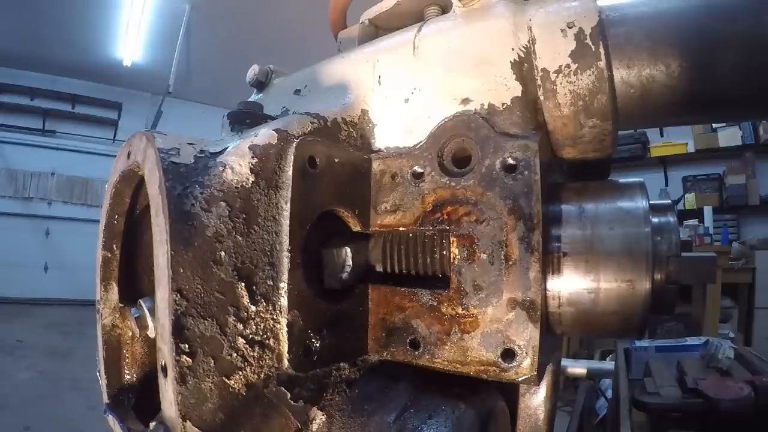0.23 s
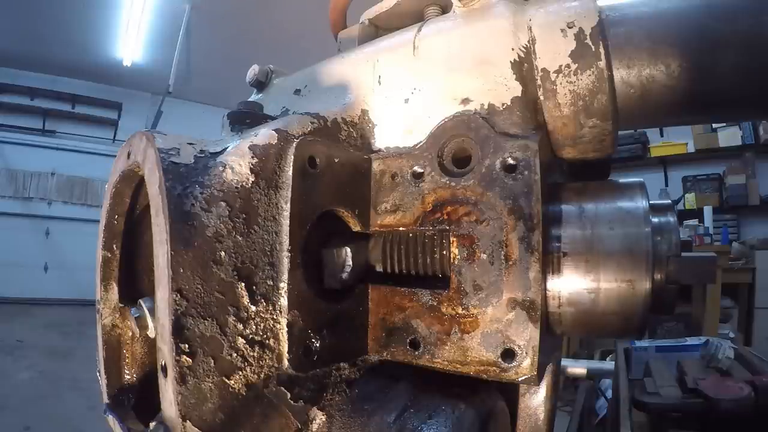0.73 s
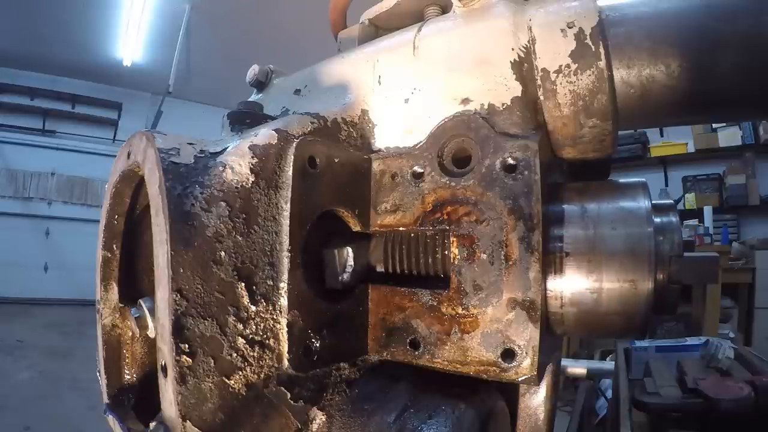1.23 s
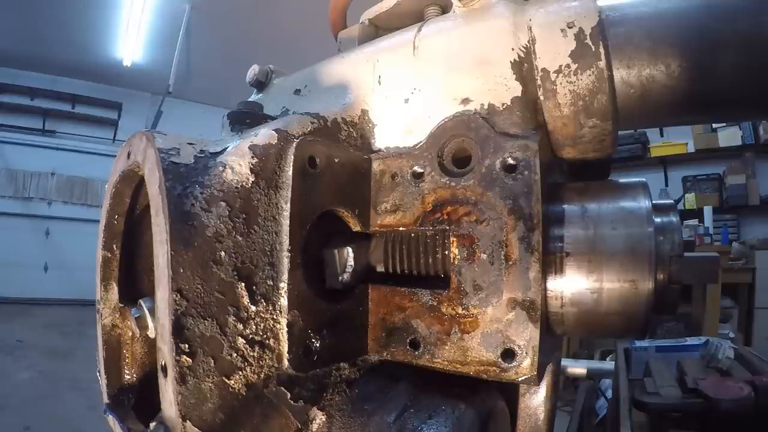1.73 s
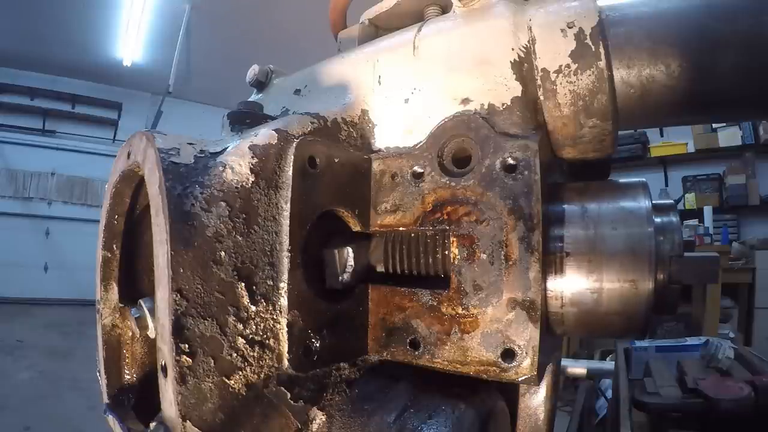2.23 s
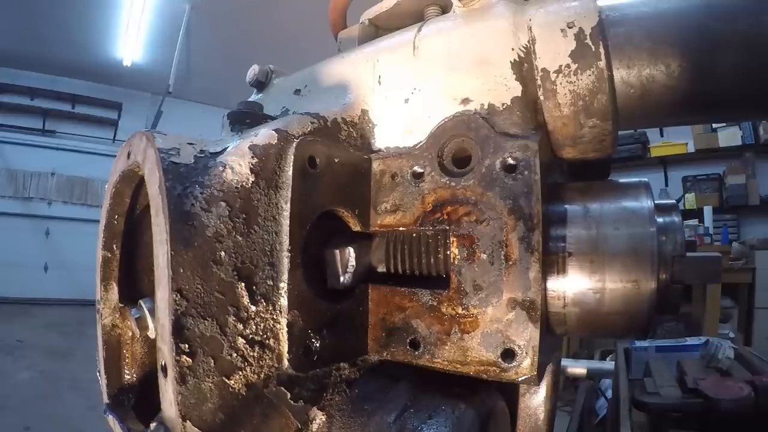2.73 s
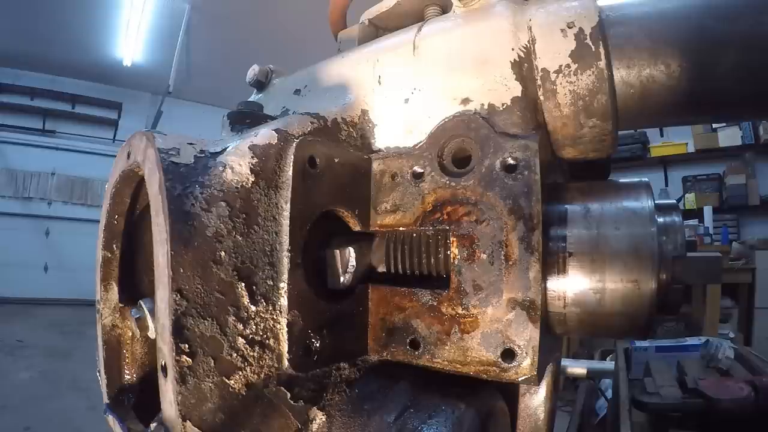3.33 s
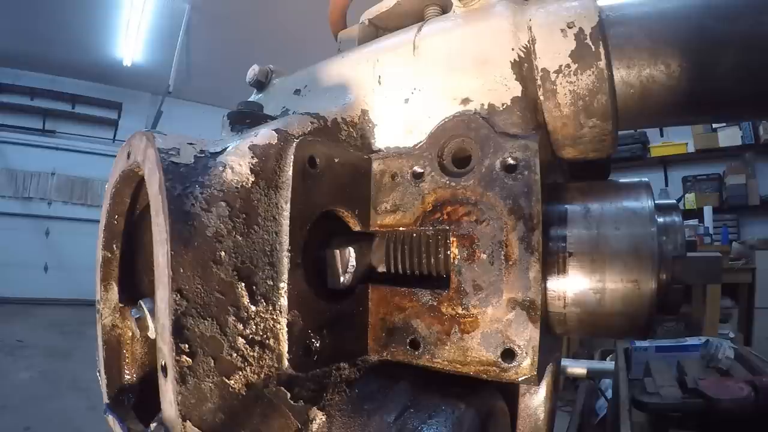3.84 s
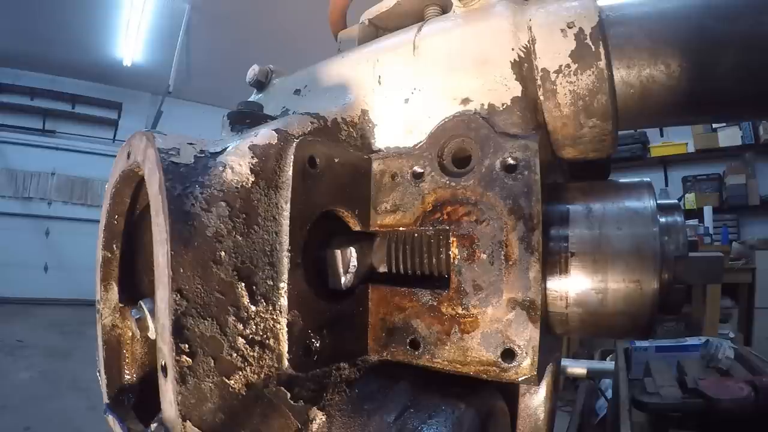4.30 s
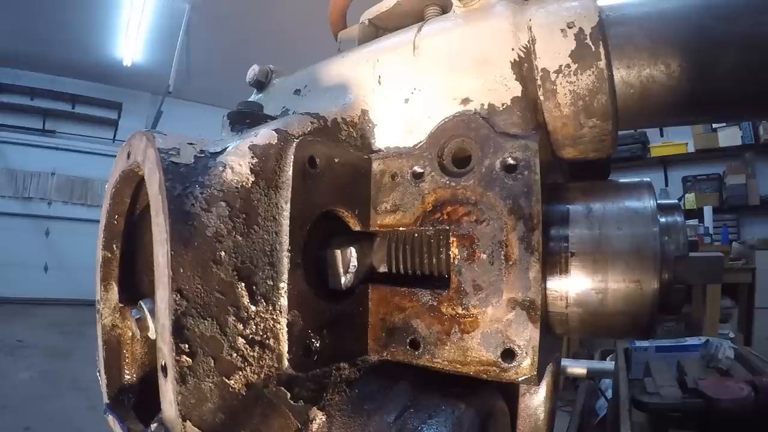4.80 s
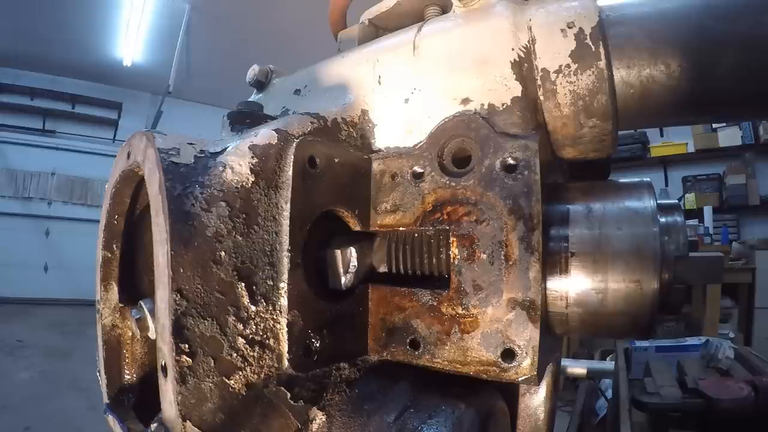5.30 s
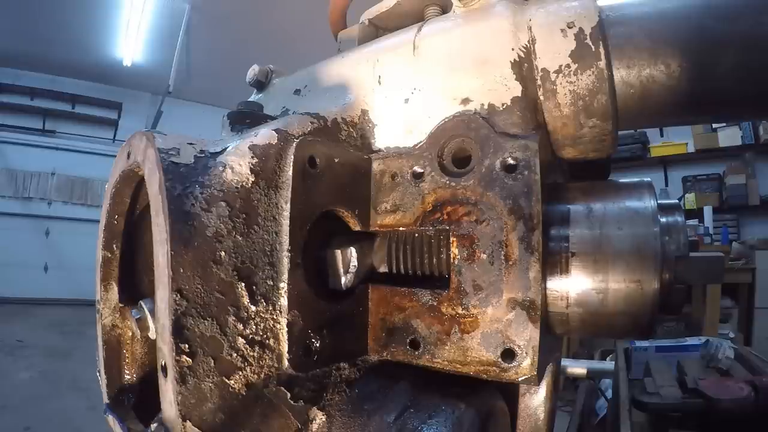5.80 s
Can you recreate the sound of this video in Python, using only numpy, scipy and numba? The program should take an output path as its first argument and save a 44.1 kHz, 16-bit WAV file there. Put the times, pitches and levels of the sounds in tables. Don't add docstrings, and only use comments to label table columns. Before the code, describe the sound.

Close up in a reverberant workshop, a stuck steel part jerks loose four times with huge cracking bangs, the last duller. Each is preceded by a handle tap and small oil gulp, and followed at once by a dull rebound blow. Between them come plate hits, dry ticks, bright clinks and soft thuds over fan rumble and mains hum. The camera microphone ducks after each bang.

```python
import sys
import numpy as np
from scipy import signal
from scipy.fft import rfft, irfft
from scipy.io import wavfile
from scipy.ndimage import uniform_filter1d
from numba import njit

SR = 44100
rng = np.random.default_rng(int(sys.argv[2]) if len(sys.argv) > 2 else 0)


def level_to_linear(level):
    exponent = np.asarray(level, float) / 20
    return 10 ** exponent


def dump(signal):
    limited = np.clip(np.atleast_2d(signal).T, -1, 1)
    pcm = np.round(limited * 32767).astype(np.int16)
    wavfile.write(sys.argv[1], SR, pcm)


N = 266977
HZ = np.fft.rfftfreq(N, 1 / SR)


def along(table, hz):
    points_hz, values = np.transpose(table)
    return np.interp(np.log(hz + 1), np.log(points_hz), values)


def colour(x, table, share=1):
    return irfft(rfft(x, N) * level_to_linear(share * along(table, HZ)), N)


def causal(table, size=2048):
    log_spectrum = np.log(level_to_linear(along(table, np.fft.rfftfreq(size, 1 / SR))))
    cepstrum = irfft(log_spectrum, size)
    folded = np.concatenate([cepstrum[:1], 2 * cepstrum[1:size // 2], np.zeros(size // 2)])
    blow = irfft(np.exp(rfft(folded)), size)
    return blow / np.abs(blow).max()


def ring(modes, seconds):
    t = np.arange(int(seconds * SR)) / SR
    tones = sum(level_to_linear(db - 60 * t / t60) * np.sin(2 * np.pi * hz * t) for hz, db, t60 in modes)
    return (1 - np.exp(-t / 0.00051)) * tones


def add(out, s, x):
    i = int(s * SR)
    out[i:i + len(x)] += x[:N - i]


def walk(rate):
    k = int(SR / rate)
    steps = np.repeat(rng.standard_normal(N // k + 1), k)
    return 1.3 * uniform_filter1d(uniform_filter1d(steps, k), k)[:N]


def pair(apart_table):
    shared, apart = rng.standard_normal((2, N))
    return shared + colour(apart, apart_table) * np.array([[1], [-1]])


# (frequency [Hz], level [dB per Hz])
AIR = [(15, -22), (25, -0.5), (126, -10.5), (198, -15), (340, -14.5), (410, -19.5), (469, -12.5),
       (567, -26.5), (895, -26.5), (1170, -23), (2060, -37.5), (4750, -40), (6920, -43), (14300, -42),
       (15500, -41)]
# (frequency [Hz], unrelated part under the shared [dB])
AIR_APART_DB = [(50, -45), (500, -20), (2000, -4), (5000, -3.5), (12000, -1)]
# (frequency [Hz], rms level [dB], pitch wander [%], level wander [dB])
TONES = [
    (51.4, -38, 2.75, 2.5),
    (119.8, -39, 0.37, -0.1),
    (151.3, -56.5, 1.5, 5.5),
    (472.5, -55, 3.5, 4),
    (1184, -60.5, 1.19, -3.5),
    (4740, -66.5, 1.28, -2),
    (9580, -65.5, 0.576, 3),
    (14350, -62, 1.1, 1.5),
]


def background():
    air = colour(pair(AIR_APART_DB), AIR)
    air = air * level_to_linear(-46.5 + 1.0 * walk(4.7)) / np.sqrt(np.mean(air ** 2))
    tones = 0
    for hz, db, wander, flutter_db in TONES:
        quick = hz / 40 + 6
        phase = 2 * np.pi * np.cumsum(hz * (1 + wander / 100 * walk(quick))) / SR
        tones = tones + np.sqrt(2) * level_to_linear(db + flutter_db * walk(quick)) * np.sin(phase)
    left_minus_right_db = -1.5
    return (air * level_to_linear(7.0) + tones) * level_to_linear(left_minus_right_db * np.array([[.5], [-.5]]))


# (time [s], level [dB])
RUSTLE = [
    (0.78, -70),
    (0.82, -60),
    (0.944, -48.5),
    (1.08, -60),
]


def sleeve():
    s, db = np.transpose(RUSTLE)
    grains = rng.standard_normal(N) * level_to_linear(2.23 * walk(119.7))
    cloth = signal.sosfilt(signal.butter(2, [500, 6000], "bandpass", fs=SR, output="sos"), grains)
    swell_db = np.interp(np.arange(N) / SR, s, db, left=-120, right=-120)
    return cloth / cloth.std() * level_to_linear(swell_db)


# (time [s], level [dB], hardness [dB per octave], metal ring [dB])
SOCKET_TAPS = [
    (0.0477, -23.5, 1.3, -39.5),
    (1.941, -24.5, 0.6, -42),
    (3.537, -28.5, 2.5, -48),
    (5.012, -33, -3, -69),
]


def gulps():
    lag_s, start_hz, rise_hz_per_s, t60_s, level_db = 0.00812, 526, 11000, .06, -31
    t = np.arange(int(.05 * SR)) / SR
    envelope = (1 - np.exp(-t / 0.0023)) * level_to_linear(level_db - 60 * t / t60_s)
    bubble = envelope * np.sin(2 * np.pi * (start_hz + rise_hz_per_s * t / 2) * t)
    out = np.zeros(N)
    for s, *_ in SOCKET_TAPS:
        add(out, s + lag_s, bubble)
    return out


# (time [s], level [dB], hardness [dB per octave])
THUDS = [
    (1.1064, -43, -3.5),
    (2.606, -33.5, -1.2),
    (4.2306, -17, 3.5),
    (5.7285, -30.5, -0.3),
    (5.9867, -28.5, 0.2),
]
# (time [s], level [dB], hardness [dB per octave])
TICKS = [
    (1.6174, -29, 0.5),
    (3.1617, -37, 4),
    (3.1739, -18.5, 1),
    (3.1973, -27, 5),
    (4.6788, -21.5, -.5),
    (5.4196, -19, -3),
    (6.0398, -35, 4),
]
# (time [s], level [dB], hardness [dB per octave], metal ring [dB])
PLATE_HITS = [
    (1.3114, -26, -3, -39),
    (2.827, -16.5, 0.5, -22.5),
    (4.372, -23, 0.5, -30.5),
]
CLINKS = [
    (1.5773, -44, -5, -44),
    (1.6244, -19.5, 2, -30),
    (4.6648, -44, -12, -54),
    (4.7068, -21, 2, -35),
]
LATCH = [
    (4.2404, -25.5, .1, -40.5),
    (4.278, -33, .1, -39.5),
]
# (rows, levels of the six parts [dB], levels of the bar's five mode groups, low to high [dB])
KINDS = [
    (THUDS, (1, 9.5, -19.5, -31, -31, -45), ()),
    (TICKS, (-2, -10.5, -46, -9.5, -13.5, -35), ()),
    (PLATE_HITS, (0.5, -27, -5, -5, -13, -44), (2.5, -12, -15, -9, -43)),
    (SOCKET_TAPS, (1.5, -24, -13.5, -10.5, -8.5, -14.5), (-22, -7, -14, 1, -32)),
    (CLINKS, (-2.5, -29, -10, -6.5, -15.5, -27), (-30, 0, -4, -8.5, -25)),
    (LATCH, (3.5, -3, -16, -25, -2, -25), (-24, -23, -12, 1.5, -0.5)),
]
# (low edge [Hz], high edge [Hz], rattle t60 [s])
PARTS = [
    (925, 1680, 0.031),
    (127, 528, 0.044),
    (392, 541, 0.023),
    (2170, 3070, 0.058),
    (3320, 6340, 0.014),
    (6370, 8500, 0.033),
]
# (frequency [Hz], t60 [s])
BAR = [
    [(470, .1), (520, .06)],
    [(1448, .2), (1455, .38)],
    [(2490, .15), (2610, .3), (2720, .2)],
    [(3900, .05)],
    [(5900, .07)],
]


def handle():
    pivot_hz = 1220
    t = np.arange(int(.1 * SR)) / SR
    near, far = np.zeros(N), np.zeros(N)
    strikes = [(row, parts_db, rings_db) for rows, parts_db, rings_db in KINDS for row in rows]
    roughs = rng.standard_normal((len(strikes), len(t)))
    for (row, parts_db, rings_db), rough in zip(strikes, roughs):
        s, db, hard_db, *ring_db = row
        for (lo_hz, hi_hz, t60), part_db in zip(PARTS, parts_db):
            octaves = np.log2(np.sqrt(lo_hz * hi_hz) / pivot_hz)
            size = level_to_linear(db + part_db + hard_db * octaves)
            band = signal.butter(3, [lo_hz, hi_hz], "bandpass", fs=SR, output="sos")
            click = signal.sosfilt(band, 1. * (t == 0))
            click = click / click.max()
            rattle = signal.sosfilt(band, rough * level_to_linear(-60 * t / t60))
            rattle = rattle / np.abs(rattle).max()
            add(near, s, size * (0.31 * click + 1.06 * rattle))
            add(far, s, size * level_to_linear(4.5) * click)
        if ring_db:
            modes = [(hz, ring_db[0] + group_db + hard_db * np.log2(hz / pivot_hz), t60)
                     for group, group_db in zip(BAR, rings_db) for hz, t60 in group]
            tone = ring(modes, seconds=.6)
            add(near, s, tone)
            add(far, s, level_to_linear(-5) * tone)
    return near, far


# (time [s], peak level [dB], softness [0-1])
SLIPS = [
    (0.196, 1.5, 0),
    (2.1, 1, 0),
    (3.699, 1, 0.01),
    (5.17, 1.47, 1),
]
# (level when sharp [dB], change when soft [dB])
SLIP_DB = [
    (-9, -6.5),
    (-6, -30),
    (-7.5, -2.5),
    (0.5, 1),
]
# (time [s], peak level [dB], pitch [Hz])
REBOUNDS = [
    (0.226, -3, 1300),
    (2.132, 0, 1300),
    (3.729, -3, 1300),
    (5.188, -1, 1300),
]
# (frequency [Hz], level [dB per Hz])
BLOW = [(41, -41), (70, -37), (147, -6), (192, -2), (230, -3), (578, -11.5), (828, -6), (947, -4),
        (1210, -3.5), (1700, -5.5), (2130, -14.5), (4080, -17), (4460, -20.5), (6530, -26.5),
        (15000, -46.5)]
# (frequency [Hz], level [dB], t60 [s])
CASTING = [(818, -1, 0.51), (921, -6, 0.73), (996, -2, 0.53), (1195, -2, 0.54), (1276, -6, 0.64),
           (1346, -3, 0.45), (1453, -3, 0.72), (1620, -4, 0.51), (1814, -16, 1.6), (1933, 0, 0.23),
           (2159, -21, 0.87), (2385, -17, 0.73), (2487, -3, 0.22), (2670, -8, 0.31), (2756, -11, 0.51),
           (3020, -14, 0.75), (3359, -18, 0.59), (3553, -19, 0.81), (3887, -16, 0.53), (4102, -10, 0.45),
           (4156, -14, 0.46), (4813, -10, 0.24), (5399, -22, 0.49), (5631, -16, 0.31), (5879, -21, 0.58),
           (6374, -25, 0.62), (6718, -21, 0.49), (7704, -26, 0.39)]


def slips():
    t = np.arange(int(.04 * SR)) / SR
    body = causal(BLOW, size=8192)
    clamped = ring([(hz, db / 2, .04) for hz, db, t60 in CASTING], seconds=8192 / SR)
    snap = body + level_to_linear(-27) * clamped[:len(body)]
    split = signal.butter(3, 2100, fs=SR, output="sos")
    thin = signal.butter(2, 650, "highpass", fs=SR, output="sos")
    near, far = np.zeros(N), np.zeros(N)
    roughs = rng.standard_normal((len(SLIPS), len(t)))
    for (s, db, soft), rough in zip(SLIPS, roughs):
        softness = np.clip(soft, 0, 1)
        treble_db, thump_db, grit_db, room_db = (sharp + softness * change for sharp, change in SLIP_DB)
        tear = (1 - np.exp(-t / 0.0017)) * level_to_linear(grit_db - 4.5 - 60 * t / 0.028)
        grit = signal.sosfilt(thin, signal.fftconvolve(tear * rough, body))
        for out, crack, gain_db in ((near, grit, 12), (far, snap, room_db + 14.5)):
            dull = signal.sosfilt(split, crack)
            bright = crack - dull
            add(out, s, level_to_linear(db + gain_db) * (dull + level_to_linear(treble_db + 9.5) * bright))
        add(near, s, level_to_linear(db + 4.5) * ring([(1315, 0.0058, 0.0095)], seconds=.03))
        frame = [(195.0, thump_db, 0.43), (113, -8.5, 0.11), (327, -11, 0.1), (252, 7.5, .025)]
        add(near, s + 0.00064, level_to_linear(db - 12.5) * ring(frame, seconds=0.36))
    for s, db, hz in REBOUNDS:
        blow = ring([(hz, db + 7, .011), (.62 * hz, db - 6, .03)], seconds=.04)
        add(near, s + 0.00069, blow)
        add(far, s, level_to_linear(-3) * blow)
    return near, far


# (frequency [Hz], unrelated part under the shared [dB])
APART_DB = [(50, -30), (500, -30), (2000, -22), (5000, -12), (12000, -2)]


def ports(x):
    t = np.arange(512) / SR
    scatter = rng.standard_normal(len(t)) * level_to_linear(-60 * t / .012)
    scatter = scatter / np.sqrt(np.sum(scatter ** 2))
    apart = colour(signal.fftconvolve(x, scatter)[:N], APART_DB)
    return x + level_to_linear(-3.5) * apart * np.array([[1], [-1]])


# (frequency [Hz], t60 [s])
SHOP_T60 = [(60, 4), (170, 0.56), (400, 0.81), (1000, 1.09), (2500, 1.085), (5000, 1.01), (8000, 0.89),
            (14000, 0.75)]


def shop(x, wet_db):
    t = np.arange(2 * SR) / SR
    dense = rfft(pair(APART_DB))
    tail = 0
    for hz in 45 * 2 ** np.arange(0, 9, .5):
        band = np.clip(1 - 2 * np.abs(np.log2((HZ + 1) / hz)), 0, 1)
        tail = tail + irfft(dense * band, N)[:, :2 * SR] * level_to_linear(-60 * t / along(SHOP_T60, hz))
    tail = tail * (1 - np.exp(-t / 0.0092))
    return level_to_linear(wet_db) * signal.fftconvolve(x[None], tail, axes=1)[:, :N]


def scene():
    near, far = np.add(slips(), handle())
    return shop(far, wet_db=-37.5) + sleeve() + background() + ports(near + gulps())


@njit
def follow(x, down, up):
    y, e = np.empty(len(x)), x[0]
    for i in range(len(x)):
        e += (x[i] - e) * (down if x[i] < e else up)
        y[i] = e
    return y


def gain_control(x):
    keen = signal.butter(2, 2000, "highpass", fs=SR, output="sos")
    treble = np.abs(signal.sosfilt(keen, x)).max(axis=0)
    loud_db = 20 * np.log10(follow(treble, 1 / (0.0056 * SR), 1 / (0.046 * SR)) + 1e-6)
    wanted_db = -10.5 * np.clip((loud_db + 41.5) / 7, 0, 1)
    return x * level_to_linear(follow(wanted_db, 1 / (.17 * SR), 1 / (.28 * SR)))


# (frequency [Hz], left minus right [dB])
LEFT_DB = [(60, -1), (300, -1.5), (1000, -0.94), (5000, 0.5), (14000, 0.5)]


def tilt(x):
    return np.array([colour(x[0], LEFT_DB, .5), colour(x[1], LEFT_DB, -.5)])


def roll_off(x):
    return signal.sosfilt(signal.butter(12, 15350, fs=SR, output="sos"), x)


def record(dry):
    x = gain_control(tilt(dry))
    x = x / (1 + np.abs(x / .96) ** 4) ** (1 / 4)
    x = signal.sosfilt(signal.butter(1, 11000, fs=SR, output="sos"), x)
    x = signal.sosfilt(signal.ellip(8, .2, 70, 15300, fs=SR, output="sos"), x)
    return roll_off(x)


dry = scene()
out = record(dry)
dump(out)
```